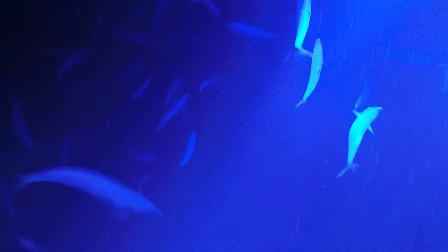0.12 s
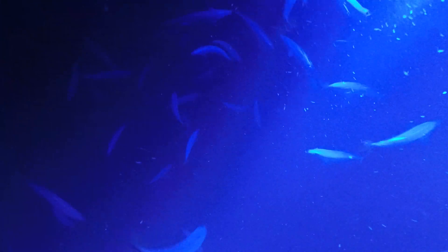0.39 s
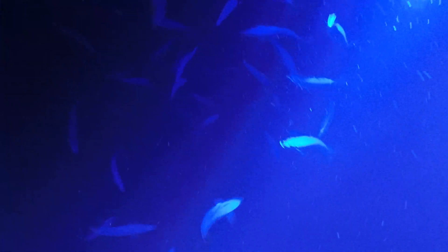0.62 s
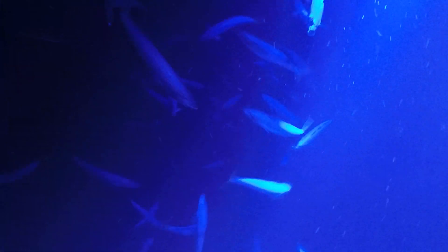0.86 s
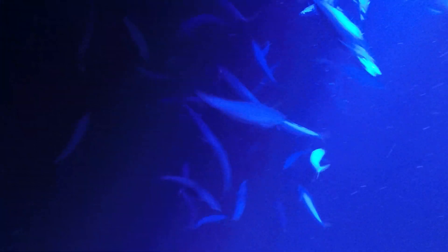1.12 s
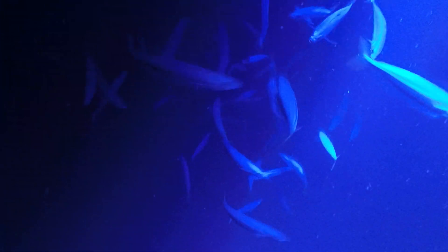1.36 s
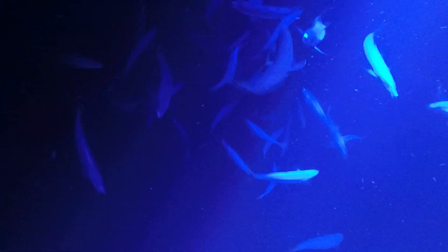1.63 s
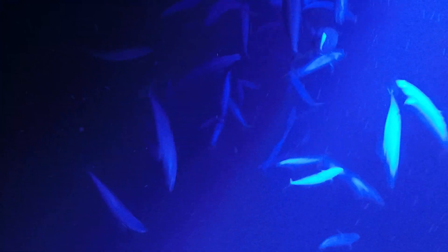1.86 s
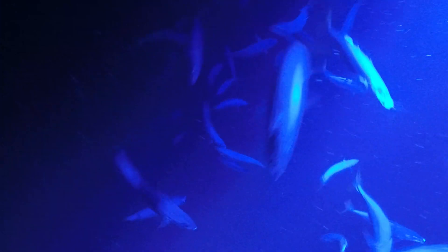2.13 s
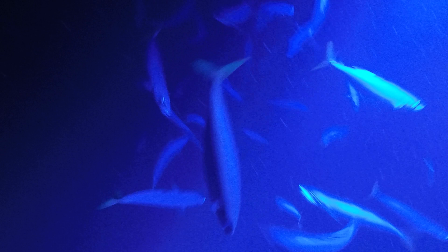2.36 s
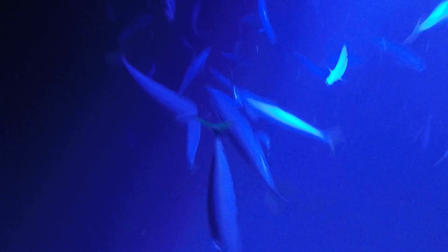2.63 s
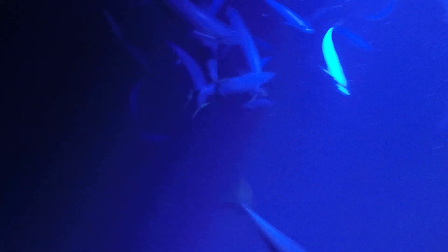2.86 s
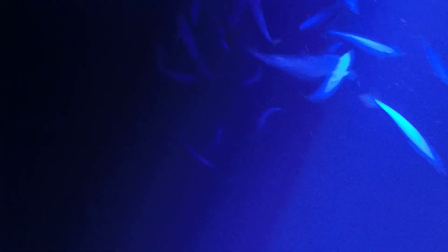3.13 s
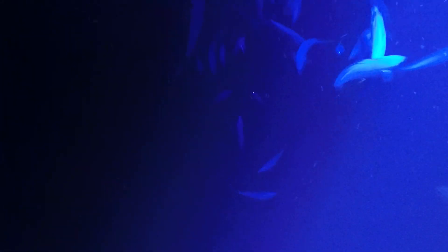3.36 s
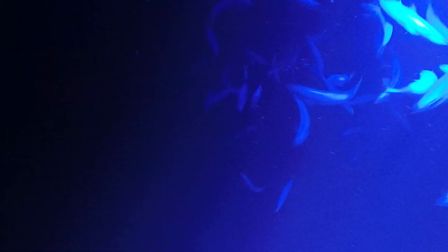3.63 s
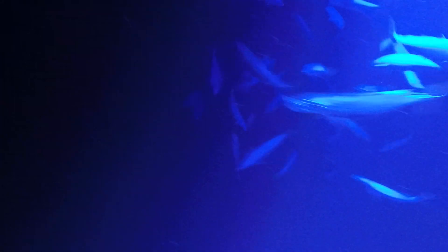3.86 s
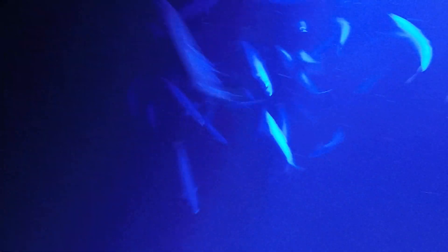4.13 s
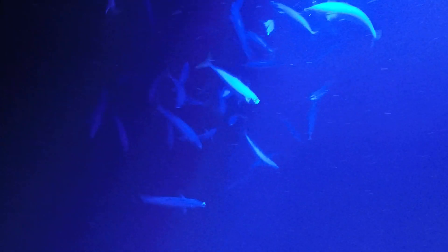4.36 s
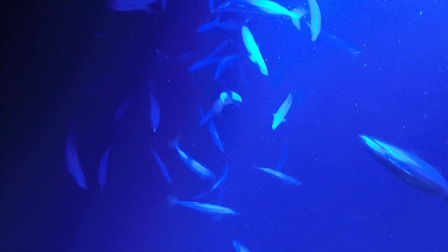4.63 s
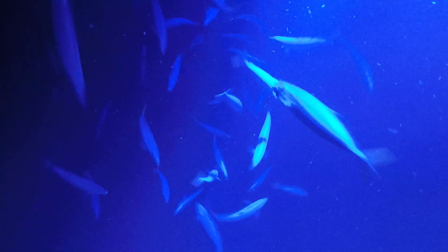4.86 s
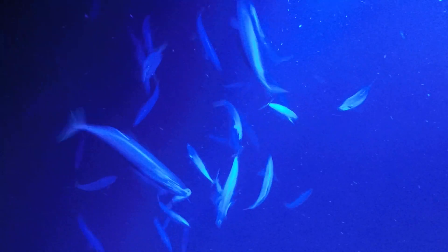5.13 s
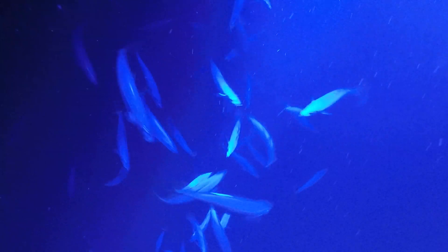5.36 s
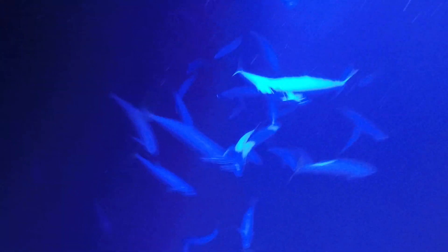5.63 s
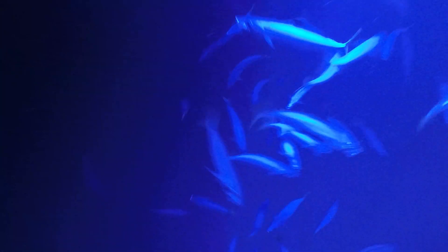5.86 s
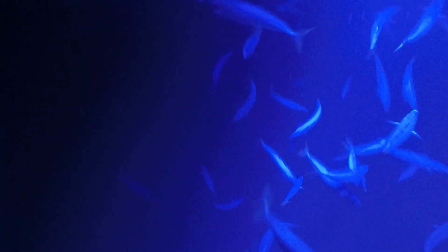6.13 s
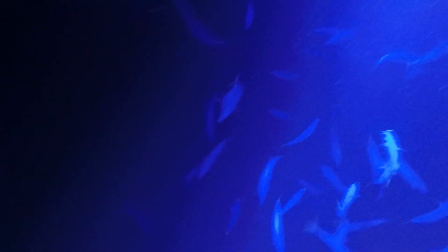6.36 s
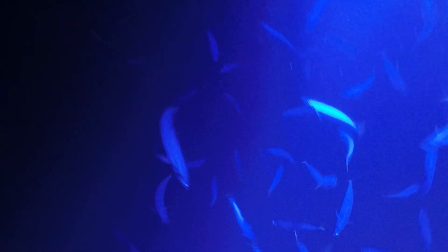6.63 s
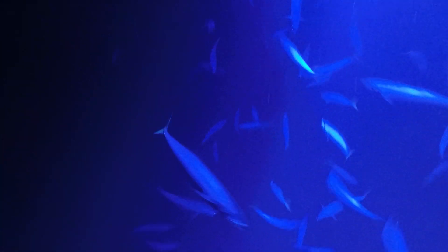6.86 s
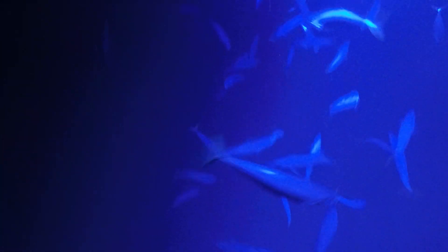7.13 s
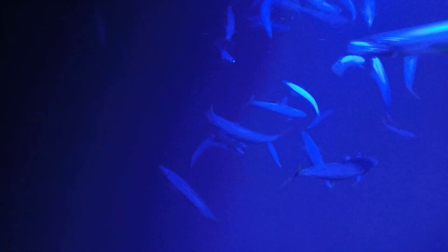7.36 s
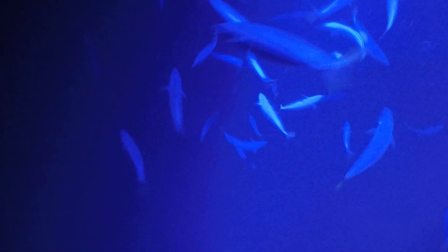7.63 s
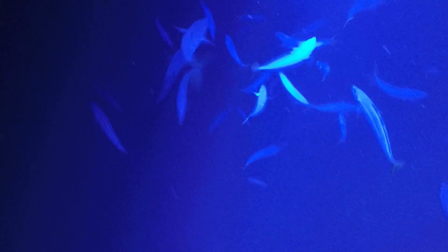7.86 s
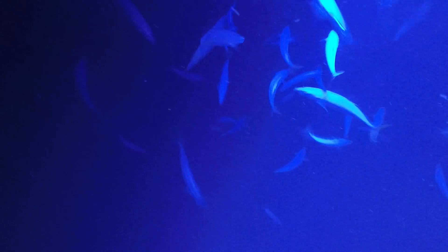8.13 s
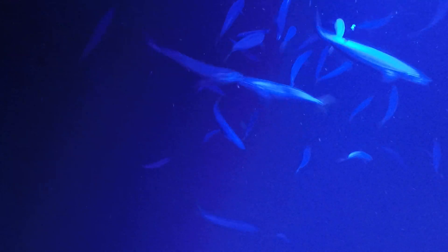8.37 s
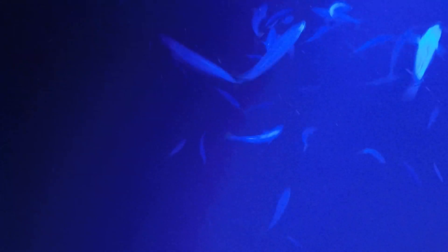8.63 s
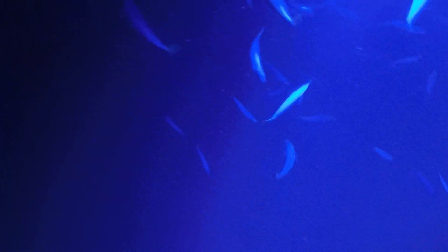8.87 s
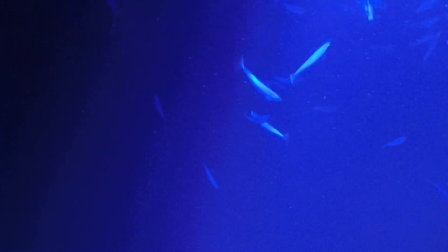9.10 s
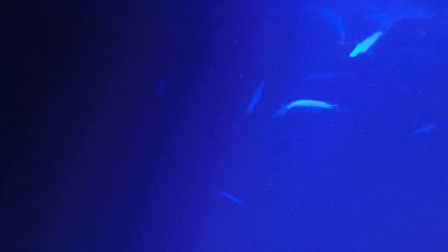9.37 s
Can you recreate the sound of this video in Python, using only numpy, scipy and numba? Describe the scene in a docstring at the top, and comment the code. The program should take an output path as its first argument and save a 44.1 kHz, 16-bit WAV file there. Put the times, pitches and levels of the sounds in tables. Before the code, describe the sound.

Underwater at night among darting fish, heard from a microphone sealed inside a camera housing. Muffled water gurgles continuously over a deep, uneven rumble and soft hiss. Dull knocks, short bubble plops and tiny dry snaps come irregularly. A faint distant motor hums low through the middle. Later the surges and thumps grow heavier, ending in a tight burst of knocks and bubbles.

```python
"""Eddies press on a sealed camera housing under water, as a deep noisy surge with shorter thuds.
Water gurgles round the housing and rings its cavity: random jolts sent through resonances.
Dull knocks, bubbles and tiny snaps are short fading tones; some bubbles also splash noise on the wall.
A distant motor hums and whines for a while as two wavering tones, over smooth hiss."""
import sys
import numpy as np
from scipy import signal
from scipy.fft import rfft, irfft
from scipy.io import wavfile
from scipy.ndimage import uniform_filter1d
from numba import njit

SR = 44100
rng = np.random.default_rng(int(sys.argv[2]) if len(sys.argv) > 2 else 0)


def volts(x):
    """Linear amplitude factor 10**(x/20) for a level x in dB, scalar or array-like."""
    e = np.asarray(x, float) / 20
    return 10 ** e


def dump(signal):
    """Clip the signal to [-1, 1] and save it as 16-bit WAV at the path in sys.argv[1]."""
    limited = np.clip(np.atleast_2d(signal).T, -1, 1)
    pcm = np.round(limited * 32767).astype(np.int16)
    wavfile.write(sys.argv[1], SR, pcm)


N = 418509
T = np.arange(N) / SR  # time of every sample, in seconds


def curves(table):
    """Joins each column of a table by straight lines in time."""
    seconds, *columns = np.transpose(table)
    return [np.interp(T, seconds, column) for column in columns]


def unit(x):
    """Scales a signal to rms 1."""
    return x / np.sqrt(np.mean(x ** 2))


def band(x, lo_hz, hi_hz, order=2):
    """Keeps only the band between two frequencies, at rms 1."""
    sos = signal.butter(order, [lo_hz, hi_hz], "bandpass", fs=SR, output="sos")
    return unit(signal.sosfilt(sos, x))


def walk(rate):
    """Random wander of rms 1: `rate` new values a second, smoothed twice."""
    hold = int(SR / rate)
    steps = np.repeat(rng.standard_normal(N // hold + 1), hold)
    return unit(uniform_filter1d(uniform_filter1d(steps, hold), hold)[:N])


def jolts(rate, spread_db):
    """Scatters about `rate` impulses a second, a few much stronger than the rest."""
    strength = rng.standard_normal(N) * volts(spread_db * rng.exponential(size=N))
    return (rng.random(N) < rate / SR) * strength


@njit
def moving_band(x, hz, width):
    """State-variable band-pass: a resonance `width` Hz wide whose centre moves."""
    y, band_state, low_state = np.empty(len(x)), 0., 0.
    for i in range(len(x)):
        g, damping = np.tan(np.pi * hz[i] / SR), width / hz[i]
        v = (band_state + g * (x[i] - low_state)) / (1 + g * (g + damping))
        band_state = 2 * v - band_state
        low_state += 2 * g * v
        y[i] = damping * v
    return y


def add_ring(out, s, db, hz, t60, rise, glide):
    """Adds a damped tone that swells over about `rise` cycles while its pitch glides."""
    t60 = max(t60, 1 / hz)  # at least one cycle
    t = np.arange(int(t60 * SR)) / SR
    ring = np.sin(2 * np.pi * hz * t * (1 + glide * t / t60))
    ring *= np.exp(-np.log(1000) * t / t60)  # 60 dB down after t60
    ring *= 1 - np.exp(-t * hz / rise)
    i = int(s * SR)
    out[i:i + len(t)] += (volts(db) * ring / np.abs(ring).max())[:N - i]


def wall(x):
    """The thick housing wall lets little through above its cavity."""
    return signal.sosfilt(signal.butter(4, 1050., fs=SR, output="sos"), x)


# Colour of the far water and microphone hiss.
# Each row: frequency in Hz, strength in dB per Hz, relative to the other rows.
HISS_COLOUR = [(240, -13), (400, 0), (585, -7), (691, -2), (843, -6.5), (1070, -11), (1350, -17.5),
               (2230, -24), (3400, -35), (4500, -29), (5810, -26), (7190, -28.5), (8500, -21.5),
               (10200, -24), (13000, -35), (15100, -44)]


def hiss():
    """Far water and microphone hiss: steady random noise, shaped by frequency."""
    level_db = -43.5  # rms
    hz, db = np.transpose(HISS_COLOUR)
    f = np.maximum(np.fft.rfftfreq(N, 1 / SR), 1)
    gain = volts(np.interp(np.log(f), np.log(hz), db))
    return volts(level_db) * unit(irfft(rfft(rng.standard_normal(N)) * gain, N))


# The distant motor's low hum and its higher whine, each lasting from its first row to its last.
# Each row: time in seconds, pitch in Hz, rms level in dB, both before a random waver.
MOTOR_HUM = [(1.7, 62, -35.5), (4.6, 61.37, -31), (5.0, 62.25, -34.5), (5.72, 62.6, -24),
             (8.05, 63.53, -30.5)]
MOTOR_WHINE = [(6.0, 985, -64), (6.85, 1005, -59), (7.22, 1021, -53), (7.35, 1012, -52), (7.7, 1004, -52),
               (7.78, 1024, -52), (8.0, 1035, -51), (8.17, 1030, -52)]


def motor():
    """Distant motor: two tones, wavering in pitch and level, that fade in and out quickly."""
    out = np.zeros(N)
    for table in (MOTOR_HUM, MOTOR_WHINE):
        hz, db = curves(table)
        running = 1. * (T > table[0][0]) * (T < table[-1][0])
        fade = uniform_filter1d(running, size=2000)
        level = np.sqrt(2) * volts(db + 2 * walk(14.))  # a sine peaks at root two times its rms
        wavering_hz = hz * (1 + .004 * walk(14.))
        out += fade * level * np.sin(2 * np.pi * np.cumsum(wavering_hz) / SR)
    return out


def crackle():
    """More distant snaps: a faint crackle of random jolts in two treble bands."""
    common = volts(-69.) * band(jolts(120., 1.), 4600.0, 9000.0)
    sparse = volts(-76.) * band(jolts(30., 1.5), 11200., 13600.)
    return common + sparse


# Sharp little snaps.
# Each row: start in seconds, peak in dB, starting pitch in Hz, time to fade by 60 dB in seconds.
SNAP_EVENTS = [(1.1985, -48, 12000, .004), (1.2535, -44, 12100, .003), (1.8679, -33.5, 6330, 0.0054),
               (1.8772, -44, 13200, .004), (3.2121, -39, 9310, .003), (3.395, -44, 7500, .003),
               (3.489, -44, 5600, .003), (3.5653, -38, 8360, .003), (3.73, -43, 5200, .003),
               (4.007, -46, 7200, .003), (4.2707, -40, 6500, .003), (6.9691, -41, 8830, .003),
               (7.359, -40, 8800, .003), (8.6407, -37, 7900, .005), (8.6847, -32, 7600, 0.0015),
               (9.101, -40, 8770, .003)]


def snaps():
    """Tiny snaps: very short high tones whose pitch sinks a little."""
    out = np.zeros(N)
    for s, db, hz, t60 in SNAP_EVENTS:
        add_ring(out, s, db, hz, t60, rise=2.5, glide=-.03)
    return out


def faint_bubbles():
    """Fainter bubbles: fading tones at random moments and pitches."""
    count, t60_s = 20, 0.064
    softest_db, spread_db = -41.5, 0.5  # peaks
    lo_hz, hi_hz = 590, 948
    out = np.zeros(N)
    for when, size, pitch in rng.random((count, 3)):
        db = softest_db - spread_db * np.log(size)
        hz = lo_hz + pitch * (hi_hz - lo_hz)
        add_ring(out, when * T[-1], db, hz, t60_s, rise=1.2, glide=-.03)
    return out


# Bubbles pinching off nearby.
# Each row: start in seconds, peak in dB, starting pitch in Hz, time to fade by 60 dB in seconds,
# strength of the splash in dB against the ring's peak, before the wall dulls it.
BUBBLE_EVENTS = [(.54, -34.5, 770, 0.038, -21), (1.336, -27.5, 830, 0.037, 2.5),
                 (1.415, -24.5, 674, 0.024, -3), (1.523, -24.5, 700, 0.02, -12),
                 (1.69, -31, 803, 0.086, -20), (2.959, -25, 784, 0.039, -7), (2.985, -34, 874, 0.096, -7),
                 (3.081, -29.5, 900, 0.06, -7), (3.257, -24.5, 846, 0.025, -7.5),
                 (3.89, -31, 790, 0.013, -10), (4.27, -35, 860, 0.025, -3), (4.271, -42, 1590, .012, -20),
                 (4.491, -20, 790, 0.024, -7), (4.59, -30.5, 720, 0.018, 1), (4.681, -30, 773, 0.1, 7.5),
                 (5.15, -32, 476, 0.028, -19), (5.331, -28.5, 977, 0.031, -21),
                 (6.11, -33.5, 810, 0.039, 1), (6.444, -31.5, 750, 0.018, 3), (6.83, -29, 810, 0.032, -17),
                 (6.907, -30.5, 832, 0.12, 4), (6.912, -21, 530, 0.024, -6.5),
                 (7.123, -31.5, 860, 0.019, -10), (7.382, -31, 817, 0.092, -23),
                 (8.189, -27, 788, 0.058, 1), (8.248, -35, 820, .037, 12.5), (8.27, -45, 2500, 0.021, -20),
                 (8.533, -28, 898, 0.084, 3.5), (8.556, -31, 835, 0.066, -20), (8.587, -31, 830, 0.038, -6),
                 (8.662, -16.5, 790, 0.06, -7), (8.698, -13, 647, 0.029, -15),
                 (8.757, -33, 1160, 0.049, -15)]


def bubbles():
    """Each bubble rings as it pinches off, and the pinch throws a broad, rough splash on the wall."""
    rings, splash = np.zeros((2, N))
    for s, db, hz, t60, splash_db in BUBBLE_EVENTS:
        add_ring(rings, s, db, hz, t60, rise=1.4, glide=-.03)
        after = np.maximum(T - s, 0)
        # a quick rise, then a fade, in seconds
        splash += volts(db + splash_db) * np.minimum(after / 0.00052, 1) * np.exp(-after / 0.032)
    rough_low = band(rng.standard_normal(N), 56.0, 284.0)
    rough_high = volts(-10.5) * band(rng.standard_normal(N), 310.0, 850.0, order=3)
    return rings + wall(splash * (rough_low + rough_high))


# Dull blows on the housing.
# Each row: start in seconds, peak in dB before the wall, starting pitch in Hz,
# time to fade by 60 dB in seconds (stretched to one cycle if shorter).
KNOCK_EVENTS = [(0.528, -20, 249, 0.084), (0.792, -24, 231, 0.055), (1.12, -24.5, 212, 0.26),
                (1.379, -17.5, 99, 0.073), (1.73, -17.5, 125, .1), (1.798, -15.5, 71.6, 0.068),
                (1.921, -17.5, 130, 0.069), (2.404, -23, 290, 0.1), (2.692, -14, 48, 0.2),
                (2.96, -17.5, 229, 0.053), (3.32, -18, 114, 0.036), (3.667, -13, 184, 0.039),
                (4.257, -13, 71.5, 0.073), (4.27, -21, 315, 0.073), (4.493, -13, 268, 0.024),
                (4.913, -18.5, 211, 0.073), (4.986, -13, 265, 0.12), (5.188, -20, 235, 0.55),
                (5.652, -10, 153, 0.034), (5.664, -17, 288, 0.22), (6.029, -21, 219, 0.21),
                (6.849, -5.5, 104, 0.023), (6.917, -16, 232.7, 0.13), (6.929, -15, 299, 0.069),
                (6.992, -18, 240, 0.046), (7.17, -20.5, 196, 0.056), (7.677, -4.5, 62.4, 0.11),
                (7.961, -18.5, 167, 0.24), (8.448, -5.5, 324.7, 0.15), (8.587, -19, 108, 0.064),
                (8.639, -7.5, 279, 0.067), (8.66, -7, 159, 0.017), (8.7, -10, 292, 0.02),
                (8.722, -18.5, 74.4, 0.064), (8.75, -12.5, 69.4, 0.027), (9.099, -15.5, 268, 0.055),
                (9.249, -15, 113, 0.024)]


def knocks():
    """Something knocks on the housing: short low tones, heard through the wall."""
    out = np.zeros(N)
    for s, db, hz, t60 in KNOCK_EVENTS:
        add_ring(out, s, db, hz, t60, rise=1.0, glide=.03)
    return wall(-out)


# Two notes of a trapped air pocket.
# Each row: pitch at the start in Hz, level before fading in dB, start of the fade in seconds.
POCKET_MODES = [(382.2, -39, 0.67), (728.2, -45.5, 1.2)]


def air_pocket(stir):
    """A trapped air pocket sings on two narrow, rising modes, each dying away as the air escapes."""
    fade_db_per_s, rise_hz_per_s = 8.5, 15.2
    out = np.zeros(N)
    for hz, db, fade_s in POCKET_MODES:
        level = volts(db - fade_db_per_s * np.maximum(T - fade_s, 0))
        moving_hz = (hz + rise_hz_per_s * T) * (1 + .015 * walk(3.))
        out += level * unit(moving_band(stir, moving_hz, 7.))
    return out


def cavity(stir):
    """The air cavity rings as a broad resonance that rises slowly and swells at the start."""
    start_hz, rise_hz_per_s, level_db, swell_s = 790, 7.1, -48, 0.63
    hz = (start_hz + rise_hz_per_s * T) * (1 + 0.026 * walk(9.))
    db = level_db + 20 * np.log10(np.clip(T / swell_s, .1, 1))
    ring = unit(moving_band(moving_band(stir, hz, 145.0), hz, 145.0))
    return volts(db + 1.0 * walk(19.0)) * ring


# Levels of the water's movement, before random wobble (the gurgles also before the wall).
# Each row: time in seconds, thuds in dB, low gurgle in dB, high gurgle in dB.
WASH_LEVELS = [(0.0, -40, -33, -41), (0.42, -33, -37.5, -37.5), (1.9, -40, -30.5, -39),
               (2.75, -34.5, -38.5, -30.5), (2.88, -43, -30.5, -33), (3.67, -27.5, -32.5, -34),
               (5.12, -30.5, -28.5, -29.5), (5.3, -32, -28.5, -36), (6.0, -31.5, -30, -33),
               (6.48, -33, -32, -34.5), (7.56, -26.5, -31.5, -33.5), (7.72, -25.5, -29.5, -34.5),
               (8.09, -34, -30, -35), (8.43, -29, -35.5, -29), (9.49, -58, -30, -35)]


def wash():
    """Dense small jolts of water, heard through low wall resonances and the housing's air cavity."""
    _, low_db, high_db = curves(WASH_LEVELS)
    # every jolt shakes all resonances together, and the flow sloshes in quick lumps
    stir = volts(.5 * walk(7.) + 1.4 * walk(25.)) * jolts(2500., 1.)
    # each surge swells the low gurgle with it
    push_db = uniform_filter1d(curves(SURGE_PUSH)[0], size=4000)
    swell_db = 0.12 * (push_db - push_db.mean())
    low = volts(low_db + swell_db + 0.78 * walk(16.0)) * band(stir, 105.7, 208.0)
    high = volts(high_db + 1.53 * walk(13.0)) * band(stir, 214.5, 348.0, order=4)
    # the trickle thins out slowly, in dB and dB per second
    trickle = volts(-39 - 1.76 * T + 2.1 * walk(15.0)) * band(stir, 323.0, 583.0)
    # a thin fizz fades steadily
    fizz = volts(-53.5 - 2.5 * T) * band(jolts(1500., 1.56), 690.0, 2080.0)
    # neighbouring wall resonances swing against each other, so no gap opens between them
    resonances = high - low - trickle
    return wall(resonances + cavity(stir) + air_pocket(stir)) + fizz


# Eddies pressing on the housing.
# Each row: time in seconds, level of the deep push in dB.
SURGE_PUSH = [(0.0, -32), (1.9, -29), (1.95, -19.5), (2.24, -27.5), (2.59, -15.5), (3.22, -26), (3.33, -17),
              (3.52, -30), (3.59, -21), (4.89, -17), (5.0, -26.5), (6.2, -26.5), (6.32, -25.5), (6.42, -22),
              (6.58, -9.5), (6.61, -21.5), (6.98, -22.5), (7.35, -15.5), (7.37, -26.5), (7.74, -12),
              (7.8, -27), (7.88, -10), (7.93, -24), (8.62, -26), (8.93, -18.5), (9.09, -26), (9.38, -24.5),
              (9.49, -15.5)]


def surge():
    """Slow pressure of passing eddies, made of deep noise, with shorter thuds riding on it."""
    push_db, thud_db = curves(SURGE_PUSH)[0], curves(WASH_LEVELS)[0]
    push = band(rng.standard_normal(N), 7.9, 35.0)
    thud = band(rng.standard_normal(N), 41.7, 88.0)
    return volts(push_db) * push + volts(thud_db + 1.5 * walk(16.)) * thud


def hollow(x):
    """A narrow band goes missing for a while and slides upward."""
    opens_s, deep_s, closes_s, shut_s = 1.18, 1.46, 2.1, 2.9
    hz = 315 + 68 * np.clip(T - deep_s, 0, shut_s - deep_s)  # slides by 68 Hz per second
    share = np.interp(T, [opens_s, deep_s, closes_s, shut_s], [0, 1, 1, 0])
    # taking the band out twice makes the hollow deeper
    once = x - share * moving_band(x, hz, 50.0)
    return once - share * moving_band(once, hz, 52.0)


def scene():
    """Everything reaches one microphone inside the housing."""
    background = hollow(hiss() + wash())
    small_sounds = crackle() + snaps() + faint_bubbles() + bubbles() + knocks()
    return (background + motor() + small_sounds + surge())[None]


def low_pass(x):
    """Removes everything above the highest recorded frequency."""
    return signal.sosfilt(signal.butter(12, 15290, fs=SR, output="sos"), x)


def record(dry):
    """The camera stores the finished mix."""
    return low_pass(dry)


dry = scene()
out = record(dry)
dump(out)
```